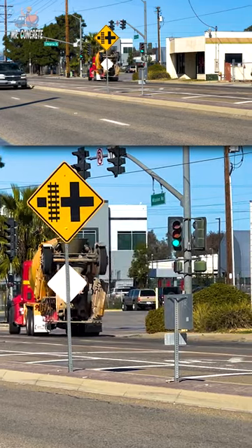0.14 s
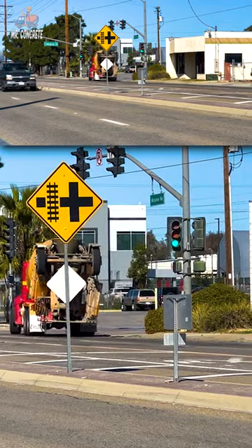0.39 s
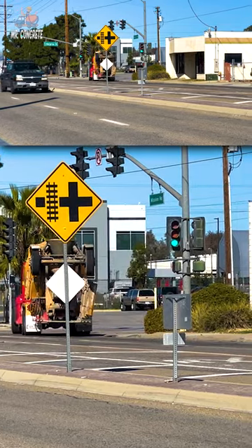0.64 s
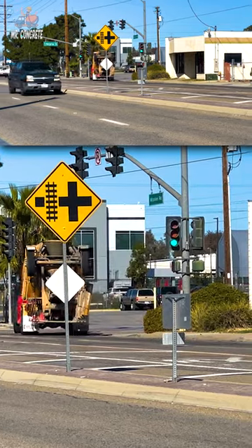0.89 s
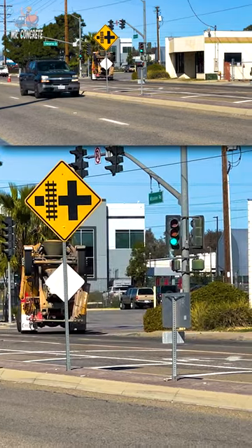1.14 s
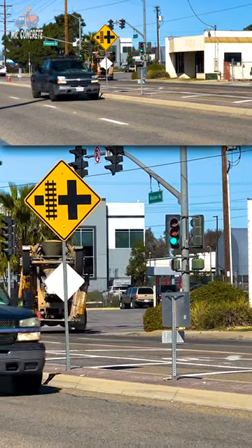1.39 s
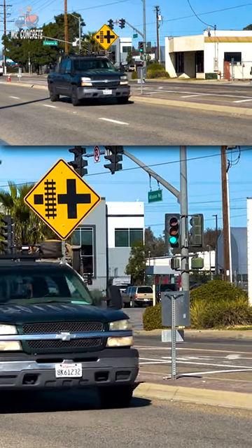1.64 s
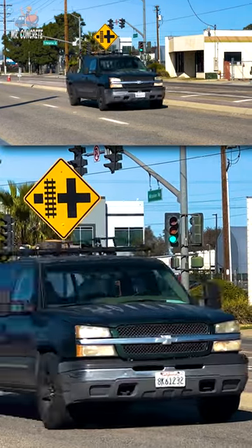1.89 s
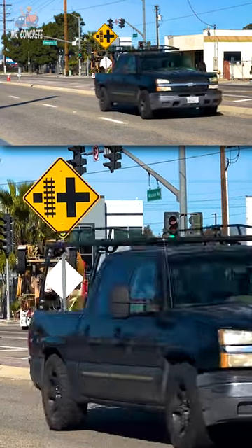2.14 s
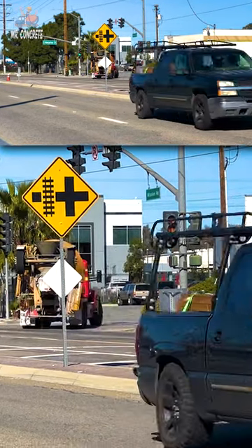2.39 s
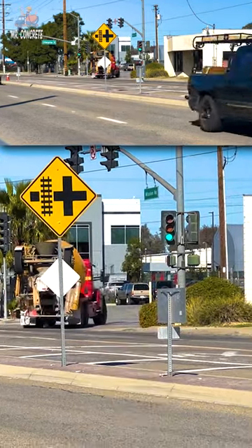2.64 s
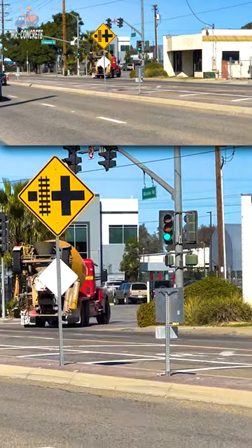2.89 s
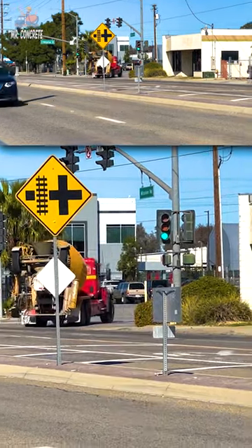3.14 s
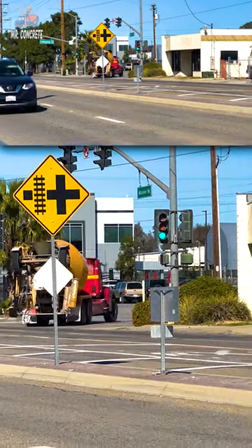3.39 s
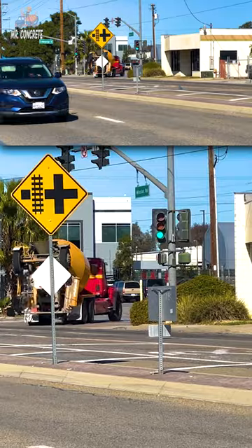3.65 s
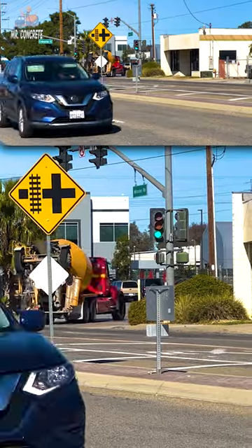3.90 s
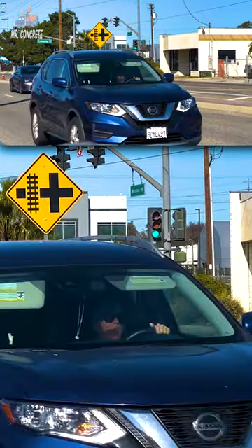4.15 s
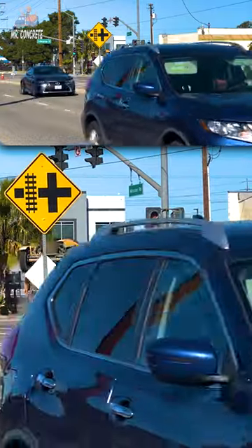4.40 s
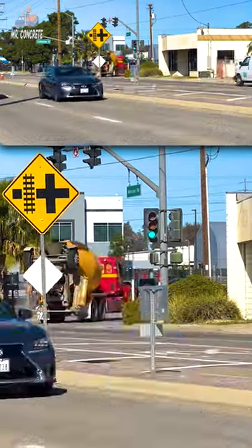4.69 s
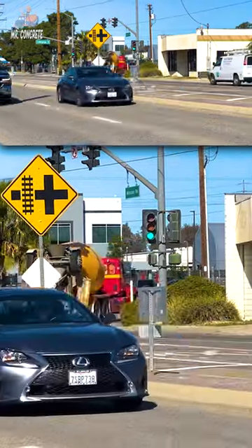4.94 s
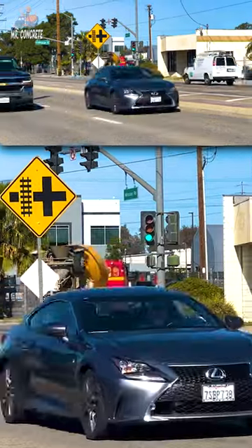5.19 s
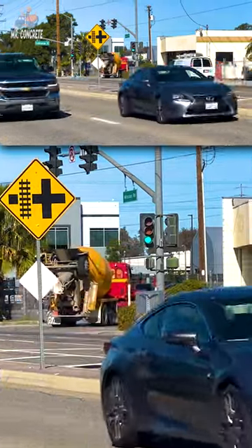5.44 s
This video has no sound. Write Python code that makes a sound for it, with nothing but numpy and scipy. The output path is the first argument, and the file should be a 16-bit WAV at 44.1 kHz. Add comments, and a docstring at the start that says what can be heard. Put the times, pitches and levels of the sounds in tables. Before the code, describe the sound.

An open roadside heard from a phone at the kerb, with wide, soft far-traffic hiss throughout. From 0 s a pickup's eight-cylinder exhaust is already audible, a low, burbling, slightly uneven drone around 135 Hz, climbing gently and growing as it accelerates. A very faint, wavering high whine near 3.9 kHz stops at about 1.9 s. The engine becomes gritty and strong by 2.5 s, with a tiny bright rattle near 2.4 s. It passes left to right around 3 s, pitch sliding down towards 115 Hz, deep rumble and breathy roar fullest at 3.1-3.5 s, with small rattles at 3.1, 3.25 and 3.65 s. From 4 s the drone recedes, lower and weaker, wavering near 108 Hz. A quiet car's smooth tyre noise swells to about 4.7 s, followed by a short low air whoosh at 4.8 s, then dulls. Another car's tread noise is rising at the 5.5 s cutoff.

```python
"""A loud eight-cylinder pickup accelerates toward a kerbside phone over far street hiss, passes, drones away.
Its exhaust is a sum of cycle orders plus rumble and pulsed roar noise; four noise puffs make its rattles.
A quiet car follows with tread noise and a wake whoosh, and another nears at the end; all are shaped noise.
The street is wide shaped noise with a thin, wavering whine that stops as the pickup nears.
Two microphone ports hear it with unequal phase and level."""
import sys
import numpy as np
from scipy import signal
from scipy.fft import rfft, irfft, next_fast_len
from scipy.io import wavfile
from scipy.ndimage import uniform_filter1d, map_coordinates

SR = 44100
rng = np.random.default_rng(int(sys.argv[2]) if len(sys.argv) > 2 else 0)


def magnitude_from_level(level_db):
    """Linear magnitude for a level in decibels (20 dB per decade)."""
    exponent = np.asarray(level_db, float) / 20
    return 10 ** exponent


def waveform_to_disk(signal):
    """Save audio, clipped to [-1, 1], as 16-bit WAV at the path in sys.argv[1]."""
    frames = np.transpose(np.atleast_2d(signal))
    scaled = np.clip(frames, -1, 1) * 32767
    samples = np.round(scaled).astype(np.int16)
    wavfile.write(sys.argv[1], SR, samples)


N = 244755
T = np.arange(N) / SR

# firing tone at the kerb, climbing under load and bent down by the pass: t/s, f/Hz
FIRING_HZ = [(0, 133.5), (.5, 135.6), (1.05, 140.2), (1.65, 143.9), (2.1, 145.7), (2.35, 147.7),
             (2.57, 147.3), (3, 123.8), (3.17, 119.2), (3.45, 116.7), (3.75, 112.7), (4.25, 110.6),
             (4.65, 107), (4.95, 106.3), (5.2, 109), (5.55, 109.8)]
# firing tone level at the kerb: t/s, level/dB
FIRING_DB = [(0, -18.5), (.3, -17.5), (1.4, -15.5), (1.62, -12.5), (1.77, -15.5), (1.9, -13), (2.35, -11.5),
             (2.5, -9.5), (2.65, -11.5), (3.15, -9.5), (3.37, -11.5), (3.55, -10), (3.88, -11), (4, -14),
             (4.13, -14), (4.35, -19), (4.87, -22), (5.05, -26), (5.33, -22.5), (5.45, -36), (5.5, -21),
             (5.55, -17)]
# orders of the engine cycle (eight firings) relative to the firing tone, by the side shown:
# order (rounded for pitch), nose/dB, flank/dB, rear quarter/dB, tail/dB
ORDERS = [(3, -21.5, -32, -33, -28.5), (5, -12, -8.5, -7, -9), (6, -20, -31, -21, -19),
          (7, -18.5, -22.5, -26.5, -17), (9, -19, -19, -19.5, -15), (10, -26, -24.5, -18.5, -31),
          (11, -18, -15, -9.5, -14.5), (12, -20.5, -17.5, -23, -29.5), (12.9, -19, -24.5, -18, -28),
          (14, -19.5, -33.5, -25.5, -28.5), (16.3, -10, -11.5, -28, -18.5), (19, -36.5, -24, -38, -35.5),
          (20.9, -18.5, -21.5, -11.5, -21.5), (21.9, -17, -35.5, -19.5, -23),
          (24, -32.5, -20.5, -14.5, -26), (26, -32, -27, -31.5, -30), (28.8, -23.5, -30.5, -19, -26),
          (30, -27, -41.5, -24.5, -32), (32, -35.5, -37, -28, -38.5)]
# angle from the nose at which each level column of ORDERS holds: angle/deg
ORDER_SIDES_DEG = [45, 92, 138, 156]
# beat of the two banks, shifting firing times more than sizes: order -> phase/rad
BANK_BEAT_RAD = {5: np.pi, 8: 0, 11: 0}
# pickup road roar, swelling under load, dropping as the driver eases off: t/s, level/dB
ROAR_DB = [(0, -44.5), (1, -38), (2, -31.5), (2.5, -30), (3.1, -28.5), (3.4, -28), (3.62, -34), (4, -41),
           (5.55, -50)]
# exhaust rumble spectrum: f/Hz, density/dB per Hz
RUMBLE_SPECTRUM = [(25, -29.5), (45, -8.5), (65, -9), (125, 1), (170, -8.5), (300, -8), (450, -15.5),
                   (1500, -70)]
# pickup roar spectrum: f/Hz, density/dB per Hz
ROAR_SPECTRUM = [(100, -23.5), (250, -5), (400, -1.5), (700, 4), (1100, -6.5), (1900, -15), (3000, -20.5),
                 (5200, -30), (9000, -33.5), (18000, -46)]
# brief bright rattles from the pickup: t/s, level before envelope/dB, centre f/Hz, width/Hz
RATTLE_PUFFS = [(2.425, -47, 12650, 5000), (3.085, -54.5, 12860, 4000), (3.245, -50, 8530, 2000),
                (3.645, -52.5, 13660, 1190)]
# quiet cars: t when level with the phone/s, speed/(m/s), lane distance/m, tyre level when level/dB
CAR_PASSES = [(4.64, 14.1, 4.1, -25.5), (6, 14.3, 3.63, -26)]
# tread noise spectrum: f/Hz, density/dB per Hz
TREAD_SPECTRUM = [(200, -6), (550, -4), (900, 1), (1300, -4.5), (1900, -6.5), (2600, -15.5), (4000, -24),
                  (5500, -31), (16000, -38)]
# far traffic spectrum: f/Hz, density/dB per Hz
STREET_SPECTRUM = [(40, -11.5), (80, 4), (300, -11), (800, -8), (1800, -19.5), (3000, -26.5), (6000, -42.5),
                   (16000, -83.5)]
# resonances of the port cavity: f/Hz, gain/dB
CAVITY = [(6000, 0), (8200, 1), (10000, -2), (12500, 2.5), (15600, -1.5)]
# the two ports: f/Hz, left minus right/dB, share unrelated between them before each noise's spread/dB
PORT_BALANCE = [(60, .5, -27.5), (300, 0.25, -11.5), (750, -1.5, -9.5), (1070, 3, -9.5), (1300, -4, -7),
                (1700, -5.5, 0.5), (2180, -2.5, -7), (2400, 0, -15.5), (5500, 1.5, -34), (6900, -1, -15.5),
                (7430, -3, -22), (7900, 0.5, -5.5), (8600, 2.5, -21), (9900, -3.5, -2.5), (11200, 2.5, -43),
                (12900, -3, -8.5), (14100, 5, -38.5)]
# port phase: f/Hz, lead of left over right/rad
PORT_LEAD = [(300, 0), (1030, -.25), (1300, -.6), (1550, -2.2), (1800, -4.6), (2070, -6), (3100, -5.55),
             (4300, -5.98), (4900, -6.27), (6300, -6.2), (7060, -5), (7430, -3.14), (7750, -2), (8100, -.5),
             (8600, -.05), (9100, -.8), (9800, -1.8), (10450, -3.12), (11700, -3.16), (12200, -3.9),
             (13600, -5.7), (13950, -6.28)]
# faint treble tones of the phone's input: f/Hz, rms level/dB
INPUT_TONES_DB = [(9520, -83), (9745, -83.5)]

# straight passes along the kerb: s when level with the phone, speed m/s, lane distance m
BODY, PIPE = (3.04, 15.2, 5.5), (3.44, 12.2, 5.7)


def exhaust():
    """Uneven firing between the banks sounds every order of the cycle; each wavers on its way over the road."""
    far_loss_db = 0.23  # per order above the firing tone and doubling of distance
    (firing_hz,), (firing_db,) = curves(FIRING_HZ), curves(FIRING_DB)
    doublings, angle_rad = passing(*BODY)
    # firings scatter more once the open tailpipe faces the kerb
    scatter_rad = np.interp(T, [2.4, 3], [.005, .01])
    cycle_rad = 2 * np.pi * np.cumsum(firing_hz) / SR / 8 + scatter_rad * wobble(30)
    smooth_db = uniform_filter1d(firing_db, SR // 3)

    # order, level dB, phase sway rad
    tones = [(8, firing_db + 0.9 * wobble(17) + 0.6 * wobble(6), 0.29)]
    for order, *sides_db in ORDERS:
        side_db = np.interp(np.degrees(angle_rad), ORDER_SIDES_DEG, sides_db)
        distance_db = far_loss_db * doublings * max(order - 8, 0)
        tones.append((order, smooth_db + side_db - distance_db + 1.5 * wobble(8), .14))

    out, way = np.zeros((2, N)), bearing()
    for order, level_db, sway_rad in tones:
        k = round(order)
        lead_rad = side_lead(way, T, order * firing_hz / 8) * np.array([[1], [-1]])
        start_rad = BANK_BEAT_RAD.get(k, rng.uniform(0, 2 * np.pi))
        phase_rad = k * cycle_rad + lead_rad + start_rad + sway_rad * wobble(8.2)
        out += np.sqrt(2) * magnitude_from_level(level_db) * np.sin(phase_rad)
    return out, cycle_rad


def pickup_noise(cycle_rad):
    """Turbulent exhaust rumble, and a roar that puffs with each firing and with each bank's uneven beat."""
    loss_db = -4, 4.5  # at 5 kHz: beside the tailpipe, growth per doubling of distance
    move = motion(*BODY, loss_db, swing=0.15, late_s=PIPE[0] - BODY[0])
    way = bearing()
    rumble_db = -23 - 3.5 * passing(*PIPE)[0]  # beside the tailpipe; fall per doubling
    rumble = magnitude_from_level(rumble_db) * rush(RUMBLE_SPECTRUM, move, way, slope=0.76, patchy_db=1.5, spread_db=3.5)
    roar = rush(ROAR_SPECTRUM, move, way, slope=0.81, patchy_db=1.02, spread_db=2.8)
    roar_db = curves(ROAR_DB)[0] + 0.24 * wobble(8.2)
    puffs = 1 + .1 * (np.sin(8 * cycle_rad) + np.sin(3 * cycle_rad) + np.sin(cycle_rad))
    return rumble + magnitude_from_level(roar_db) * puffs * roar


def rattles():
    """Each rattle is a puff of noise around its own pitch: 3 ms rise, 60 dB decay in 80 ms."""
    out, t = np.zeros(N), np.arange(SR // 16) / SR
    for start_s, level_db, centre_hz, width_hz in RATTLE_PUFFS:
        noise = uniform_filter1d(rng.standard_normal(len(t)), max(round(SR / width_hz), 1))
        band = unit(noise * np.sin(2 * np.pi * centre_hz * t))
        envelope = magnitude_from_level(level_db - 60 * t / .08) * (1 - np.exp(-t / .003))
        out[round(start_s * SR):][:len(t)] += band * envelope
    return out


def car():
    """Tread noise swells as a car comes level, brightest just after; the first wake adds a short low whoosh."""
    loss_db = 0, 4.5  # at 5 kHz: at its brightest, growth per doubling of distance
    brightest_late_s = .16  # rear tyres
    tread, moves = 0, []
    for *path, level_db in CAR_PASSES:
        move = motion(*path, loss_db, swing=.05, late_s=brightest_late_s)
        swell_db = level_db - 5.5 * passing(*path)[0] + 0.48 * wobble(6.2)
        noise = rush(TREAD_SPECTRUM, move, [(0, -0.2)], slope=1.0, patchy_db=1.46, spread_db=3.5)
        tread = tread + magnitude_from_level(swell_db) * noise
        moves.append(move)
    wake_spectrum = [(200, -14), (520, -3.5), (800, -9.5), (2000, -56)]  # f/Hz, density/dB per Hz
    wake = rush(wake_spectrum, moves[0], [(0, -.3)], slope=0.94, patchy_db=1, spread_db=0.0)
    wake_db = -32.5 - 5.5 * ((T - 4.8) / 0.17) ** 2
    return tread + magnitude_from_level(wake_db) * wake


def street():
    """Far traffic, widely spread, with a thin rising whine that stops as the pickup nears."""
    whine_end_s, fade_s = 1.95, .1
    whine_db = -72.5 + 3.5 * T + 1.5 * wobble(3)
    gate = np.clip((whine_end_s - T) / fade_s, 0, 1)
    whine_hz = 3900 + 15 * wobble(2.5)
    whine = np.sqrt(2) * magnitude_from_level(whine_db) * gate * np.sin(2 * np.pi * np.cumsum(whine_hz) / SR)
    traffic = rush(STREET_SPECTRUM, [(0, 0.0021, 0.86)], [(0, 0.0039)],
                   slope=1, patchy_db=0.6, spread_db=8.5)
    return magnitude_from_level(-38.0) * traffic + whine


def rush(spectrum, move, way, slope, patchy_db, spread_db):
    """Patchy stereo noise near rms 1 before distance loss; move rows dull it and shift its colour."""
    hz, t, z = signal.stft(rng.standard_normal((3, N)), SR, nperseg=1024)
    loss_db, shift = curves(np.array(move)[:, :3], t)
    patches = uniform_filter1d(uniform_filter1d(rng.standard_normal(z[0].shape), 8, 0), 6, 1)
    colour = magnitude_from_level(along(spectrum, np.outer(hz, 1 / shift)))
    colour = colour / np.sqrt(np.mean(colour ** 2))
    gain = colour * magnitude_from_level(patchy_db * unit(patches) - np.outer((hz / 5000) ** slope, loss_db))
    turn = np.exp(1j * side_lead(way, t, hz[:, None]))
    shared = z[0] * np.array([turn, 1 / turn])
    # reflections differ from port to port
    unrelated = magnitude_from_level(along(PORT_BALANCE, hz, axis=2) + spread_db)[:, None] * z[1:]
    return signal.istft((shared + unrelated) * gain, SR, nperseg=1024)[1][:, :N]


def passing(level_s, speed_m_s, lane_m):
    """Doublings of distance beyond the nearest point, and angle from the nose in radians."""
    ahead_m = speed_m_s * (level_s - T)
    return np.log2(np.hypot(ahead_m, lane_m) / lane_m), np.arctan2(lane_m, ahead_m)


def motion(level_s, speed_m_s, lane_m, loss_db, swing, late_s=0):
    """Rows (s, 5 kHz loss dB, colour factor): treble fades with distance, colour drops through the pass."""
    doublings = passing(level_s + late_s, speed_m_s, lane_m)[0]
    angle_rad = passing(level_s, speed_m_s, lane_m)[1]
    rows = np.transpose([T, loss_db[0] + loss_db[1] * doublings, 1 + swing * np.cos(angle_rad)])
    return rows[::SR // 100]


def bearing():
    """Rows (s, lead of left scale in rad): the pickup crosses from left to right."""
    lead_rad = -0.11 + .2 * np.cos(passing(*BODY)[1])
    return np.transpose([T, lead_rad])[::SR // 100]


def side_lead(way, t, hz):
    """Half the extra phase lead of left for a source off to one side; it grows with pitch, then fades."""
    return curves(way, t)[0] * np.sqrt(hz / 115) * np.exp(-(hz / 1500) ** 2) / 2


def unit(x):
    """Scaled to rms 1."""
    return x / np.sqrt(np.mean(x ** 2) + 1e-20)


def along(points, hz, axis=1):
    """One column of a table read on a log frequency axis."""
    cols = np.transpose(points)
    return np.interp(np.log(hz + 1), np.log(cols[0] + 1), cols[axis])


def curves(rows, t=T):
    """Each column after the time, joined by straight lines."""
    s, *cols = np.transpose(rows)
    return [np.interp(t, s, c) for c in cols]


def wobble(rate_hz):
    """A smooth random curve, rate_hz knots a second."""
    return map_coordinates(rng.standard_normal(int(N * rate_hz / SR) + 4), [T * rate_hz])


def scene():
    """Everything that reaches the two ports."""
    tones, cycle_rad = exhaust()
    return tones + pickup_noise(cycle_rad) + rattles() + car() + street()


def roll_off(x):
    """The treble ends steeply here."""
    return signal.sosfilt(signal.butter(12, 15850, fs=SR, output="sos"), x)


def record(dry):
    """Ports shift phase and level between channels; the input cuts deep bass, rounds peaks, adds faint tones."""
    pad = 4096
    dry = np.pad(dry, ((0, 0), (pad, pad)), "reflect", reflect_type="odd")  # extended past both ends so the port filter starts and stops smoothly
    m = next_fast_len(N + 16384)
    hz = np.fft.rfftfreq(m, 1 / SR)
    half = np.exp(.5j * along(PORT_LEAD, hz)) * magnitude_from_level(along(PORT_BALANCE, hz) / 2)
    colour = magnitude_from_level(along(CAVITY, hz)) / (1 + (40 / (hz + 1)) ** 6)
    x = irfft(rfft(dry, m) * colour * np.array([half, 1 / half]), m)[:, pad:pad + N]
    x = x / (1 + abs(x / .95) ** 8) ** (1 / 8)
    for tone_hz, level_db in INPUT_TONES_DB:
        x = x + np.sqrt(2) * magnitude_from_level(level_db) * np.sin(2 * np.pi * tone_hz * T + wobble(20))
    return roll_off(x)


dry = scene()
out = record(dry)
waveform_to_disk(out)
```